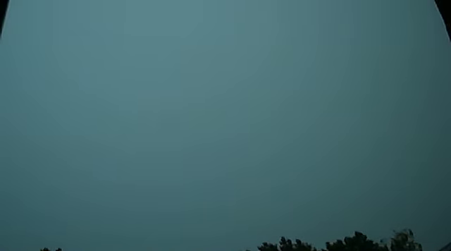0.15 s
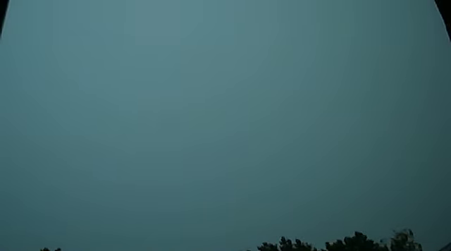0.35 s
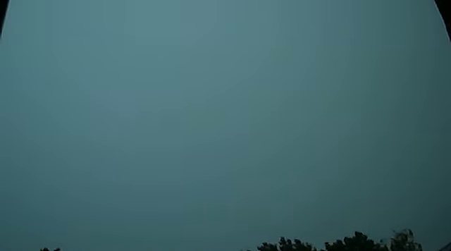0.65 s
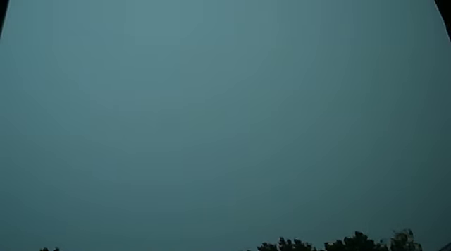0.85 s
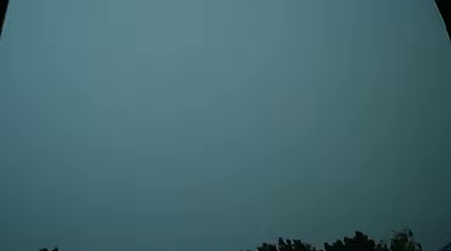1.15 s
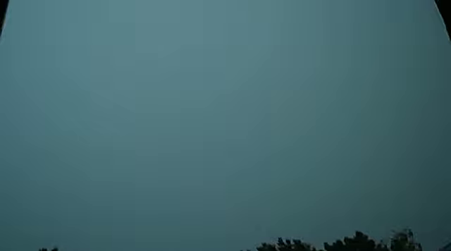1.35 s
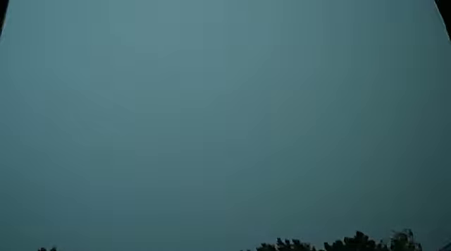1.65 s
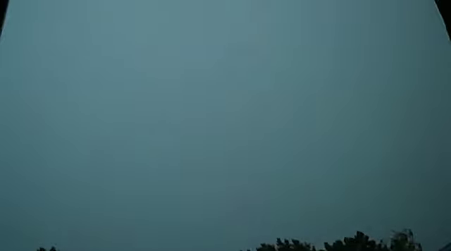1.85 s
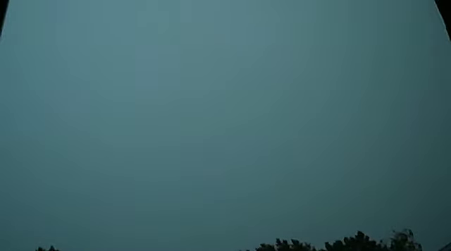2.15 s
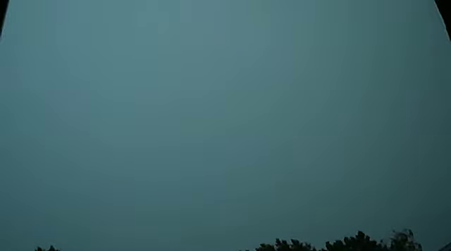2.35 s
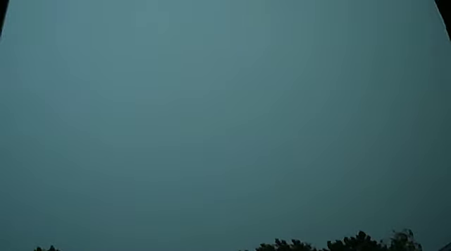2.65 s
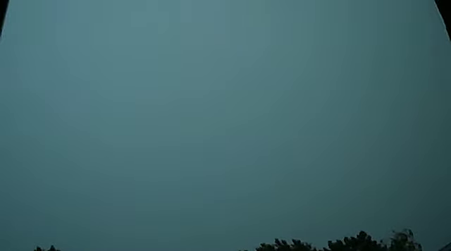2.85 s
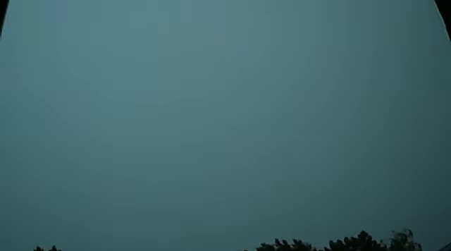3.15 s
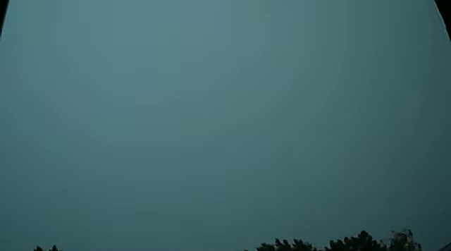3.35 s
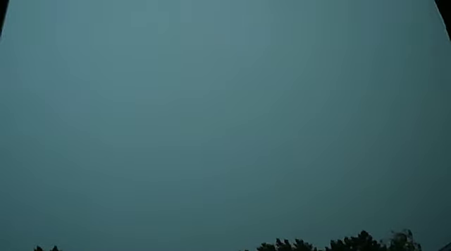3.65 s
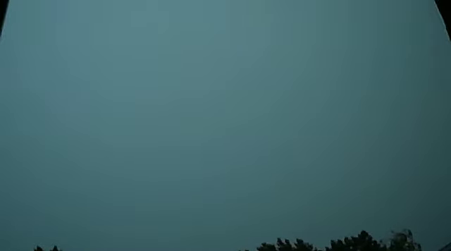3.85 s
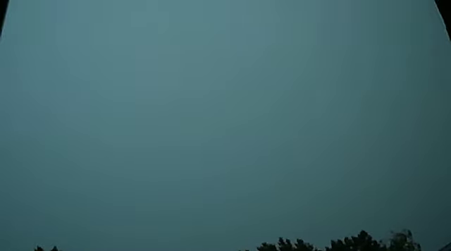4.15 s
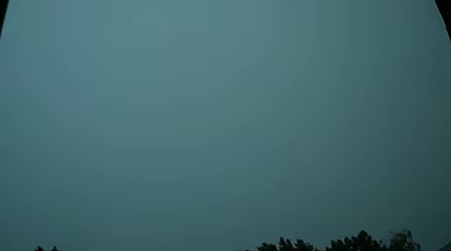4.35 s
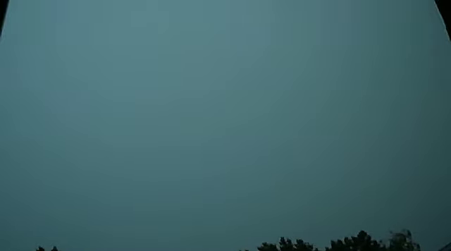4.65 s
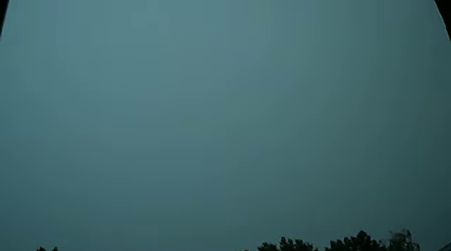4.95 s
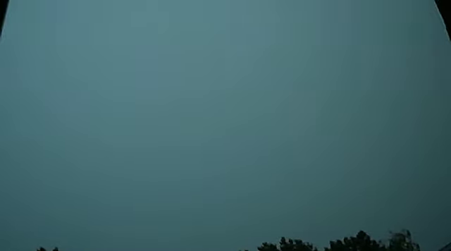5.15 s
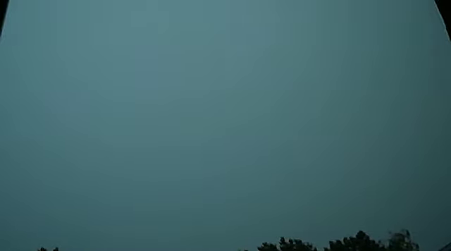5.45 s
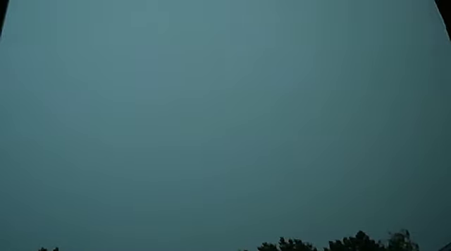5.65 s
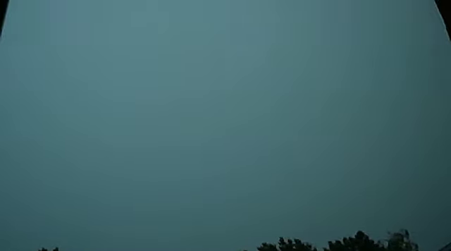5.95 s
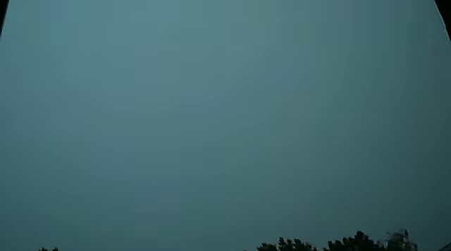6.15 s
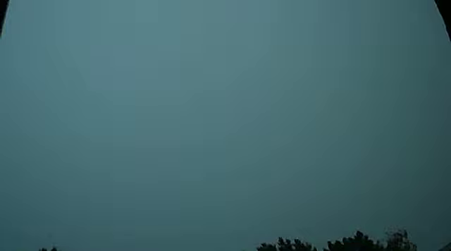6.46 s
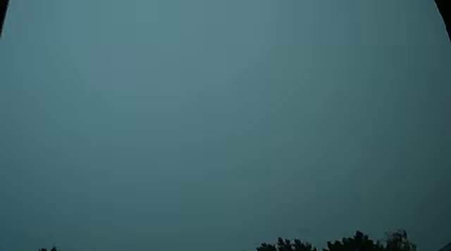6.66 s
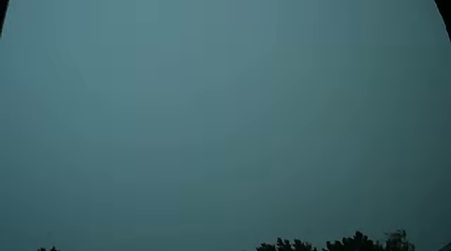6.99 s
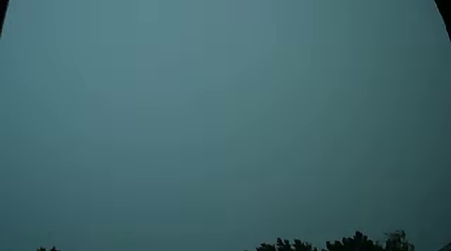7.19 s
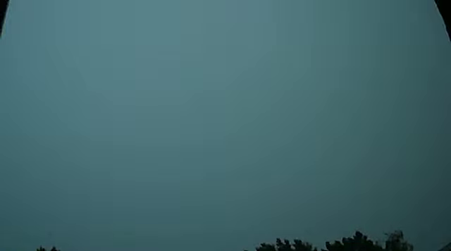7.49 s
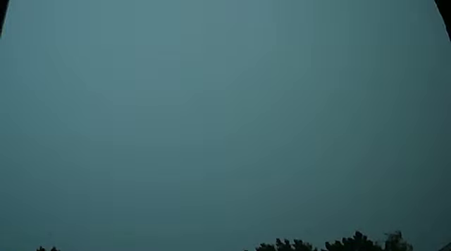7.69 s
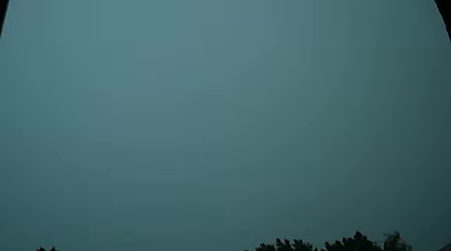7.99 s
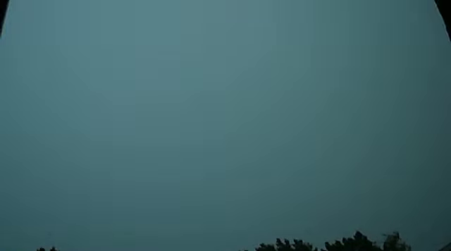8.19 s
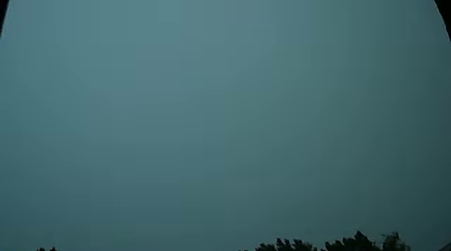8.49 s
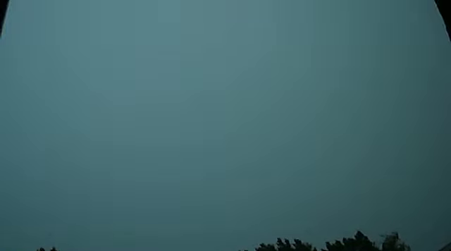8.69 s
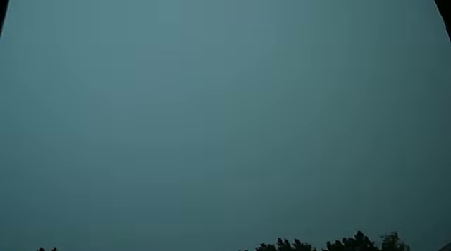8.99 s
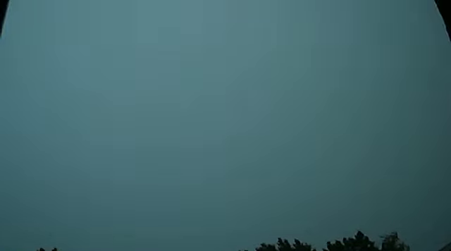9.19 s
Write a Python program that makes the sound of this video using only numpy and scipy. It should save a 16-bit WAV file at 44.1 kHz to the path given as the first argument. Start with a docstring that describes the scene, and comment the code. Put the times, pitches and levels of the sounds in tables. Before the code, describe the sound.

Thunder growls, cracks sharply, then swells into loud, heavy, slightly distorted rolls over steady light rain outdoors.

```python
"""Thunder over steady light rain, heard outdoors through a small camera's narrow-band microphone input.
Rain ticks on nearby leaves throughout. A low growl comes first, then a sharp crack at about 2.6 s.
Two long heavy rolls peak near 5.7 s and 7.2 s and overload the input; a brighter third follows at 8.5 s.
The thunder is shock fronts from the crooked lightning channel, arriving by the hundreds in surges."""
import sys
import numpy as np
from scipy import signal
from scipy.fft import rfft, irfft, next_fast_len
from scipy.io import wavfile
from scipy.ndimage import uniform_filter1d

SR = 44100
rng = np.random.default_rng(int(sys.argv[2]) if len(sys.argv) > 2 else 0)


def waveform_to_disk(signal):
    """Save audio, clipped to [-1, 1], as 16-bit WAV at the path in sys.argv[1]."""
    frames = np.transpose(np.atleast_2d(signal))
    scaled = np.clip(frames, -1, 1) * 32767
    samples = np.round(scaled).astype(np.int16)
    wavfile.write(sys.argv[1], SR, samples)


N = 411453
TIME = np.arange(N) / SR


# Surges at the microphone, one per stretch of channel; boom, tear and peal are relative to the level:
# (start [s], rise [s], hold [s], level [dB], deep boom [dB], near tear [dB], hollow peal [dB])
THUNDER_SURGES = [(-0.05, 0.17, 1, -36.5, -1.5, 0, -15.5), (0.767, 0.49, 0.45, -17, -4.5, -7, -11.5),
                  (1.762, 0.14, 0.49, -21.5, -4, -5.5, -13.5), (2.432, 0.11, .05, -13.5, -1, -13, -22),
                  (2.584, 0.026, 0.21, -12.5, -18, -7.5, -4), (2.805, 0.1, 0.2, -12, -9, -6.5, -12),
                  (3.097, 0.062, 0.045, -10.5, -3.5, -5.5, -8), (3.147, 0.21, .35, -15, 0.5, -5.5, -17),
                  (3.836, 0.095, 0.29, -16, -5, -7, -12.5), (4.187, 0.068, 0.16, -10.5, -3, -10.5, -18),
                  (4.512, 0.067, 0.13, -7.5, -1, -9, -16), (4.678, 0.11, .17, -6, -2, -8, -17.5),
                  (5.087, .08, 0.52, -4, -6, -12, -22.5), (5.568, 0.085, 0.47, -2, -2.5, -10, -23),
                  (6.254, 0.097, 0.34, -8, 0.5, -8.5, -14), (6.598, 0.08, 0.1, -2.5, -1, -15.5, -19.5),
                  (6.776, .07, .68, 0.5, -1.5, -11, -13.5), (7.542, 0.087, 0.37, -7, -5, -10, -13),
                  (8.009, 0.12, .27, -12.5, -0.5, -6.5, -8), (8.492, 0.18, 0.49, -17, -1.5, 0, -1.5),
                  (8.801, 0.24, 0.27, -8, -5.5, -5.5, -6.5)]

def surge_gains(release_db_per_s=52.5):
    """Gains over time of body, boom, tear and peal: surges rise, hold and die away; their powers add."""
    power = np.zeros((4, N))
    for start, rise, hold, db, *parts_db in THUNDER_SURGES:
        age = TIME - start
        attack = np.clip(age / rise, 0, 1)
        release = amp(-release_db_per_s * np.maximum(age - rise - hold, 0))
        peaks = amp(db + np.array([0, *parts_db]))
        power += np.outer(peaks, attack * release) ** 2
    return np.sqrt(power + 1e-12)


# Thunder from a distance, its treble absorbed by the air: (frequency [Hz], level [dB])
DISTANT_SPECTRUM = [(8, -15.5), (36, -7), (52, -1.5), (80, -1), (110, -1), (250, -3), (310, -12),
                    (540, -12.5), (750, -16.5), (1030, -24.5), (1300, -36.5), (1700, -49), (4000, -51.5)]
# Booming of walls near the microphone: (frequency [Hz], width [Hz], lift [dB])
WALL_RESONANCES = [(61, 20, 3), (159.9, 13, 5), (228, 20, 2)]

def air_path(hz):
    """Gain of the path from channel to microphone, with the walls' resonances."""
    walls_db = sum(db / (1 + (2 * (hz - centre) / width) ** 2) for centre, width, db in WALL_RESONANCES)
    return amp(read(DISTANT_SPECTRUM, hz) + walls_db)


def roll(body_gain, boom_gain, tear_gain, boom_hz=88, tear_hz=300, lump_hz=9, lump_db=1.0):
    """Far parts of the channel boom, the bulk of it rolls, parts nearer the microphone tear."""
    deep = lambda hz: below(hz, boom_hz, order=12)
    boom = shocks(lambda hz: air_path(hz) * np.sqrt(deep(hz)), per_s=500, spread_db=3, steady_s=.1)
    body = shocks(lambda hz: air_path(hz) * np.sqrt((1 - deep(hz)) * below(hz, tear_hz)),
                  per_s=900, spread_db=2.5, steady_s=.07)
    tear = shocks(lambda hz: air_path(hz) * np.sqrt(1 - below(hz, tear_hz)),
                  per_s=4000, spread_db=1.5, steady_s=.06)
    lumps = noise(lambda hz: below(hz, lump_hz) * (1 - below(hz, lump_hz / 2)))  # fronts arrive unevenly
    return amp(lump_db * lumps) * (boom_gain * boom + body_gain * body + tear_gain * tear)


def shocks(colour, per_s, spread_db, steady_s):
    """A stream of coloured shock fronts: lumpy from moment to moment, of even power over longer times."""
    fronts = filtered(arrivals(per_s, spread_db), colour)
    span = int(steady_s * SR)
    power = uniform_filter1d(uniform_filter1d(fronts ** 2, span), span)
    return fronts / np.sqrt(abs(power) + 1e-20)


# Claps and thuds, where a straight stretch of channel reaches the microphone all at once:
# (time [s], level [dB], pitch [Hz])
THUNDER_CLAPS = [(0.225, -33, 755), (0.317, -35, 820), (0.728, -26, 600), (1.187, -24, 246),
                 (1.637, -25, 455), (2.325, -27, 800), (2.628, -7.5, 371), (2.646, -4.5, 306),
                 (2.686, -8.5, 286.5), (2.745, -8.5, 320), (2.863, -7, 301), (2.932, -6, 235),
                 (3.189, -4.5, 263), (3.5, -16, 57.6), (3.66, -4.5, 210.3), (4.331, -6.5, 65),
                 (4.565, -3.5, 212.2), (4.595, -7.5, 55.6), (4.819, -2, 50), (4.996, -4.5, 191),
                 (5.21, -3, 206.3), (5.422, -3.5, 44.8), (5.48, -3.5, 196.8), (5.653, 4.5, 231.2),
                 (5.787, 4.5, 216.7), (6.128, -1, 216.6), (6.718, 1.5, 104), (6.839, -1, 239.5),
                 (6.87, 3, 90.5), (7.088, 3, 80.7), (7.179, 9, 83.6), (7.15, 1, 228.5), (7.249, -2, 246),
                 (7.3, 8.5, 126.3), (7.98, -8, 225), (8.217, -7, 218.8), (8.36, -6, 186), (8.776, -12, 369),
                 (8.85, -8, 393), (8.95, -7, 335), (9.036, -6.5, 363)]

def claps(jitter_periods=.22, snap_db=-23):
    """Each clap is a quick volley of N-shaped pressure waves with a rough, brighter snap."""
    out = np.zeros(N)
    for centre_s, db, pitch_hz in THUNDER_CLAPS:
        half_s = .036 / 2 * (247 / pitch_hz) ** .7  # 36 ms in all at 247 Hz; deeper claps last longer
        t = np.arange(-half_s, half_s, 1 / SR)
        fronts_s = (np.arange(-16, 17) + jitter_periods * rng.standard_normal(33) + rng.random()) / pitch_hz
        phase = (t[:, None] - fronts_s) * 2 * np.pi * pitch_hz
        n_waves = -phase * np.exp(-phase ** 2 / 2)
        volley = unit_rms(n_waves.sum(1))
        grit = rng.standard_normal(SR // 2)[:len(t)]
        snap = unit_rms(filtered(grit, lambda hz: below(hz, 1300, order=6) * (1 - below(hz, 400))))
        add(out, centre_s - half_s, amp(db) * np.hanning(len(t)) * (volley + amp(snap_db) * snap))
    return out


def peal(gain, centre_hz=386, width_hz=110):
    """Fronts of like width crowd their energy into one hollow band."""
    band = lambda hz: np.sqrt(below(abs(hz - centre_hz), width_hz / 2, order=4))
    return gain * shocks(band, per_s=700, spread_db=2.5, steady_s=.078)


# Crackle of the lightning branches closest to the microphone: (frequency [Hz], level [dB])
CRACKLE_SPECTRUM = [(200, -17), (550, -6.5), (1000, 2.5), (1300, -2), (1700, -11), (2600, -16), (4000, -32)]

def crackle(body_gain, gain_db=-29, fade_from_s=3.2, fade_db_per_s=4.5):
    """Small sharp fronts from near branches keep their treble, and fade once those have been heard."""
    fade_db = fade_db_per_s * np.maximum(TIME - fade_from_s, 0)
    gain = amp(gain_db - fade_db) * body_gain ** .46  # follows the roll by this share of its dB
    return gain * shocks(lambda hz: amp(read(CRACKLE_SPECTRUM, hz)), per_s=3600, spread_db=1.5, steady_s=.18)


# Wash of rain on trees and ground, some way off: (frequency [Hz], level [dB])
RAIN_SPECTRUM = [(30, 12.5), (300, 9.5), (700, 12), (1050, 10.5), (1500, -5), (2000, -4.5), (3200, 0),
                 (4200, -6)]

def rain(wash_db=-37.5, drops_db=-54.5, drops_per_s=330, swell_db=.5):
    """A distant wash and nearer drops ticking on leaves, swelling a little together."""
    wash = noise(lambda hz: amp(read(RAIN_SPECTRUM, hz)))
    swell = noise(lambda hz: below(hz, 5))
    t = np.arange(SR // 100) / SR
    drops = np.zeros(N)
    pitches_hz = np.geomspace(1200, 3800, 8)
    for hz in pitches_hz:
        tick = np.sin(2 * np.pi * hz * t) * np.exp(-t * hz / 2.7)
        impacts = arrivals(drops_per_s / len(pitches_hz), spread_db=1)
        drops += signal.oaconvolve(impacts, tick)[:N]
    return amp(swell_db * swell) * (amp(wash_db) * wash + amp(drops_db) * unit_rms(drops))


def arrivals(per_s, spread_db):
    """Clicks at random moments, of either sign and uneven size."""
    hit = rng.random(N) < per_s / SR
    sign = rng.choice([-1., 1.], N)
    return hit * sign * amp(spread_db * np.minimum(rng.exponential(1, N), 4))


def noise(colour):
    """Coloured noise with an rms of one."""
    return unit_rms(filtered(rng.standard_normal(N), colour))


def amp(db):
    """Decibels to gain."""
    return 10 ** (np.asarray(db) / 20)


def unit_rms(x):
    """Scales to an rms of one."""
    return x / np.sqrt(np.mean(x ** 2) + 1e-20)


def read(points, hz):
    """Reads a table on a log-frequency axis."""
    points_hz, values = np.transpose(points)
    return np.interp(np.log(hz + 1), np.log(points_hz + 1), values)


def filtered(x, gain):
    """Applies a gain that is a function of frequency."""
    size = next_fast_len(len(x) + SR // 10)
    hz = np.fft.rfftfreq(size, 1 / SR)
    return irfft(rfft(x, size) * gain(hz), size)[:len(x)]


def below(hz, corner_hz, order=8):
    """Low-pass curve: one far under the corner, a half at it."""
    return 1 / (1 + (hz / corner_hz) ** order)


def add(mix, start_s, sound):
    """Mixes a sound in at a time."""
    part = mix[max(round(start_s * SR), 0):][:len(sound)]
    part += sound[:len(part)]


def scene():
    """Thunder and rain at one microphone in the open air."""
    body, boom, tear, hollow = surge_gains()
    return (roll(body, boom, tear) + peal(hollow) + crackle(body) + claps() + rain())[None]


# Colour of the camera's output: (frequency [Hz], gain [dB])
CAMERA_RESPONSE = [(3400, 0), (4000, -1), (4500, -3), (5200, 0), (6500, -1), (7700, 2), (8500, 0),
                   (12500, -1), (15300, 1)]

def record(dry, input_rate_hz=8000, input_ceiling=.703, output_ceiling=.707, edge_hz=16000):
    """The microphone's narrow-band input samples coarsely and clips flat under the heavy rolls."""
    coarse = signal.resample_poly(dry[0], input_rate_hz, SR)
    overloaded = np.clip(coarse, -input_ceiling, input_ceiling)  # flat tops choke the rain for a few ms
    smooth = signal.resample_poly(overloaded, SR, input_rate_hz, window=("kaiser", 9))[:N]
    spitting = np.clip(smooth, -output_ceiling, output_ceiling)  # steep edges overshoot and clip again
    coloured = filtered(spitting, lambda hz: amp(read(CAMERA_RESPONSE, hz)))
    low_pass = signal.firwin(511, edge_hz, window=("kaiser", 9), fs=SR)
    return signal.oaconvolve(coloured, low_pass, "same")[None]


dry = scene()
out = record(dry)
waveform_to_disk(out)
```